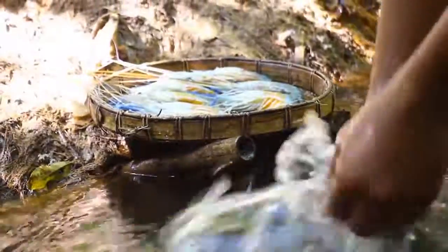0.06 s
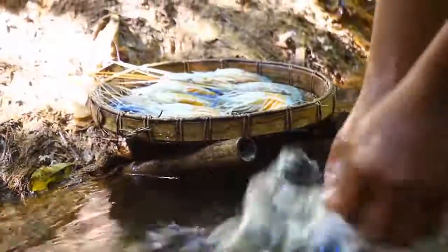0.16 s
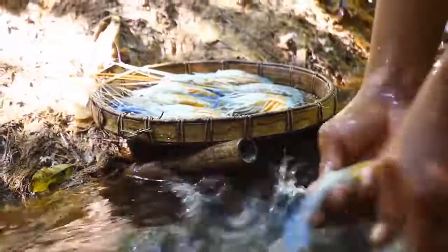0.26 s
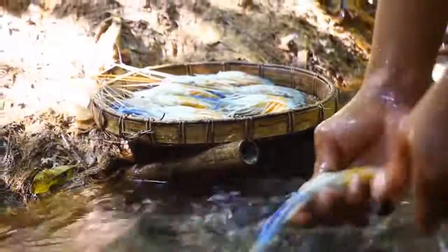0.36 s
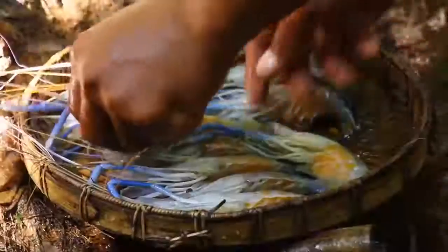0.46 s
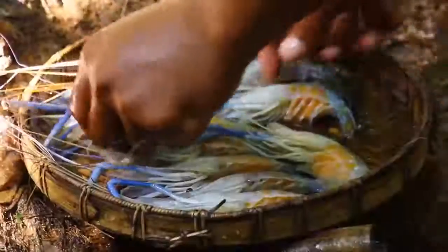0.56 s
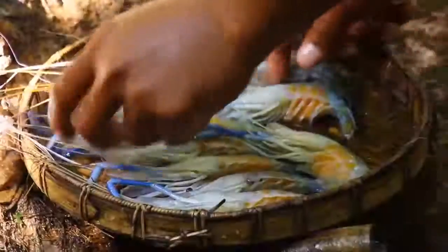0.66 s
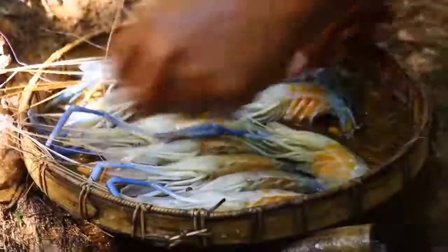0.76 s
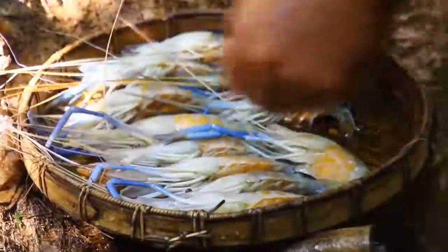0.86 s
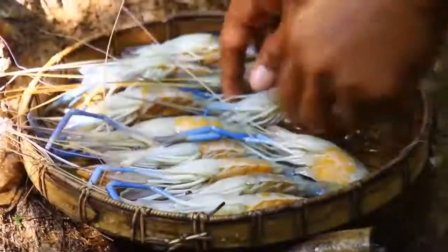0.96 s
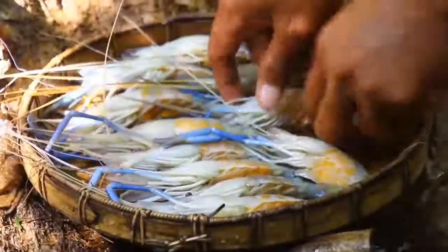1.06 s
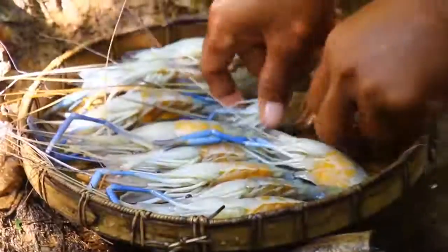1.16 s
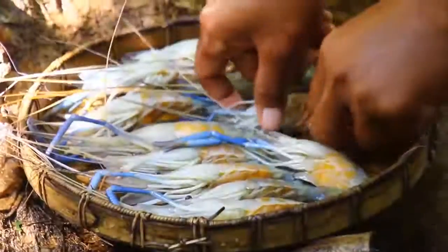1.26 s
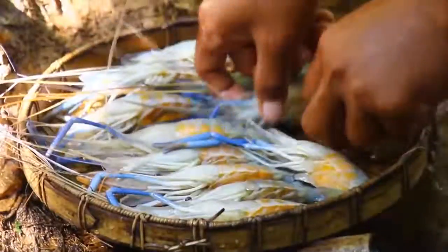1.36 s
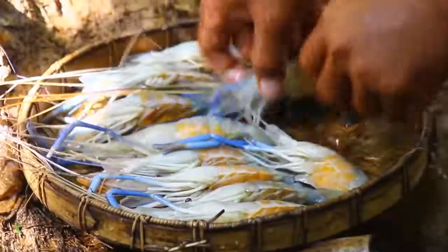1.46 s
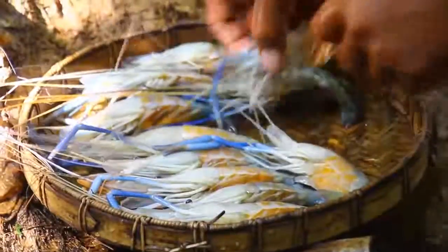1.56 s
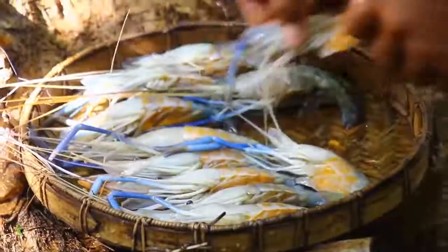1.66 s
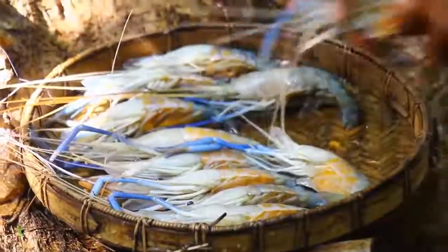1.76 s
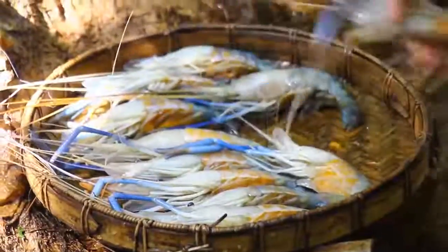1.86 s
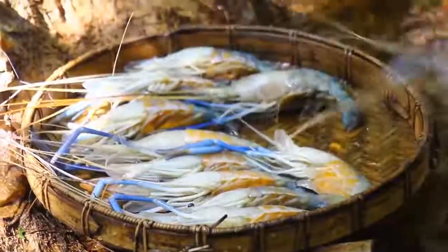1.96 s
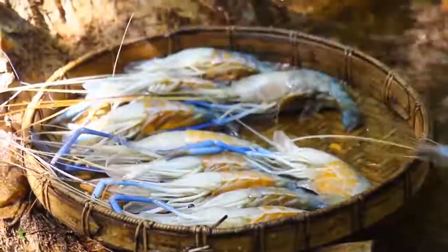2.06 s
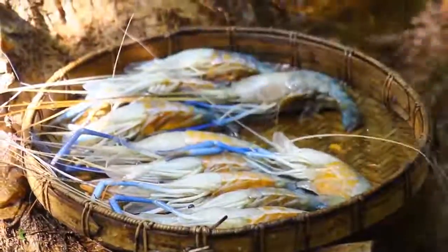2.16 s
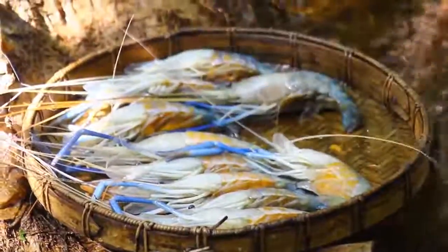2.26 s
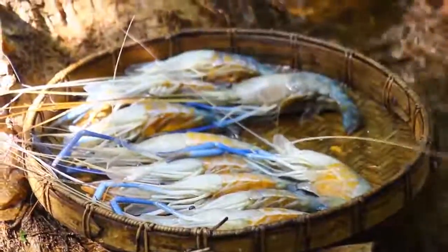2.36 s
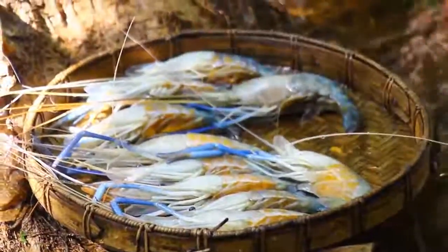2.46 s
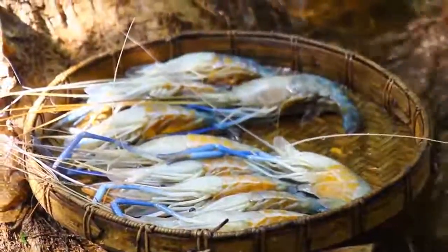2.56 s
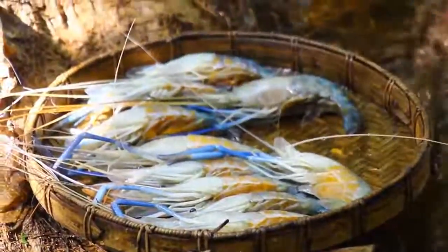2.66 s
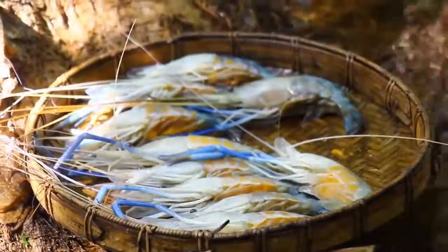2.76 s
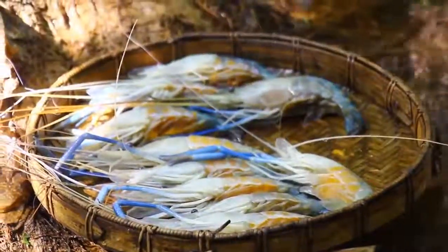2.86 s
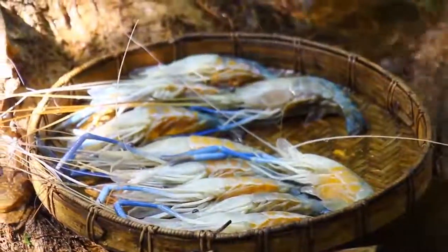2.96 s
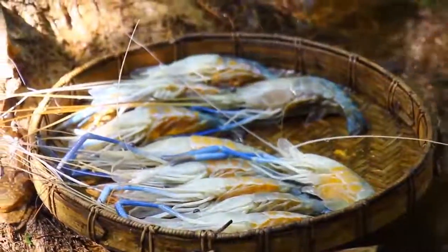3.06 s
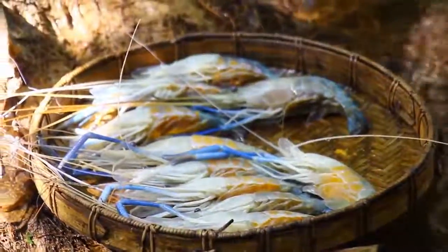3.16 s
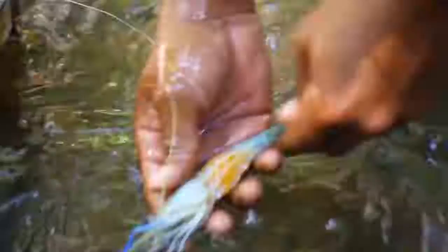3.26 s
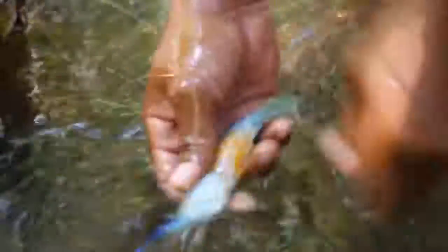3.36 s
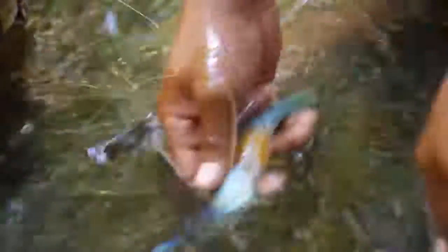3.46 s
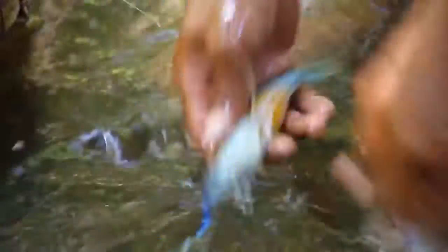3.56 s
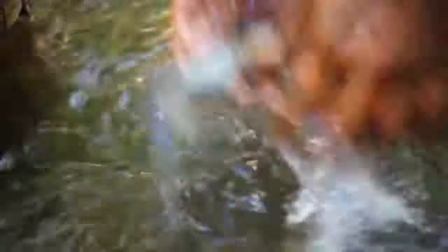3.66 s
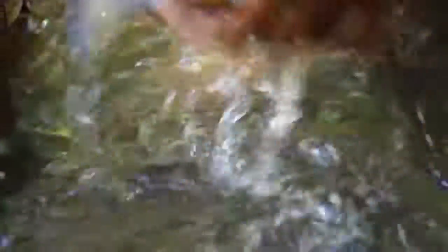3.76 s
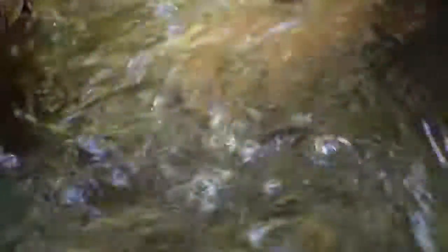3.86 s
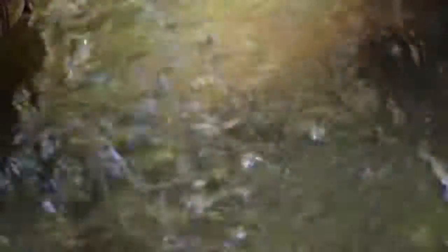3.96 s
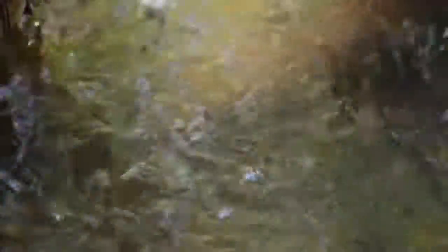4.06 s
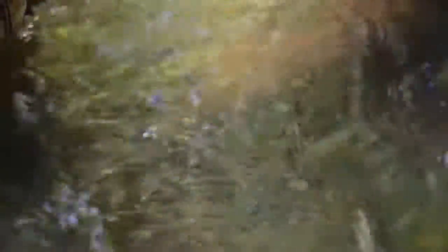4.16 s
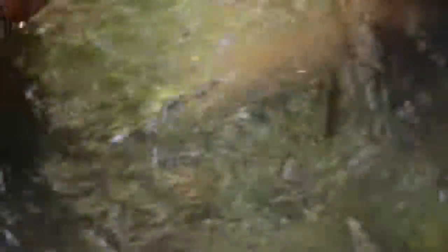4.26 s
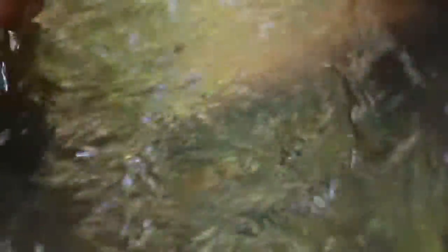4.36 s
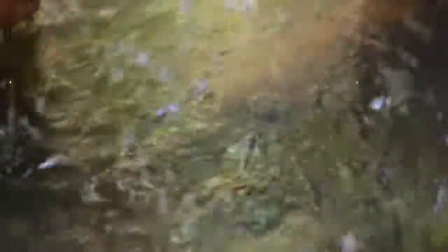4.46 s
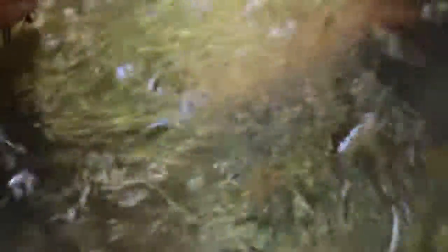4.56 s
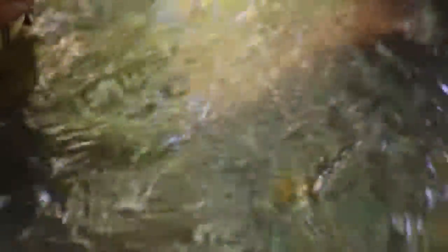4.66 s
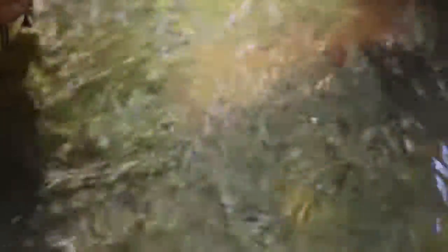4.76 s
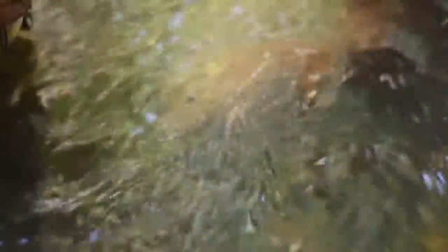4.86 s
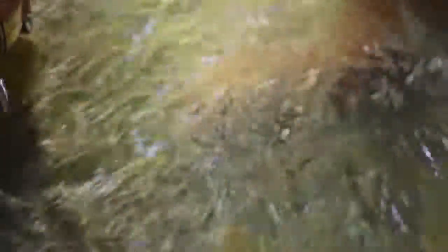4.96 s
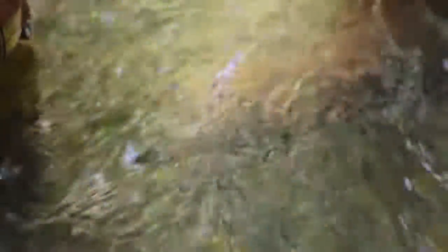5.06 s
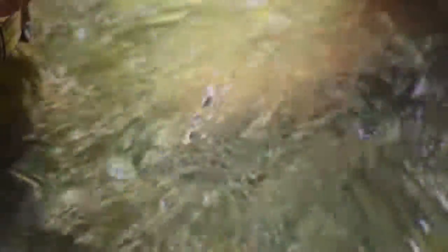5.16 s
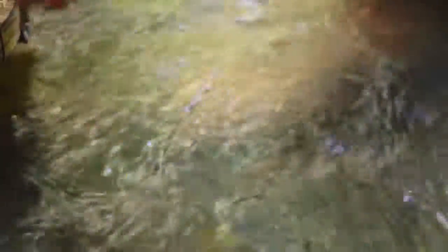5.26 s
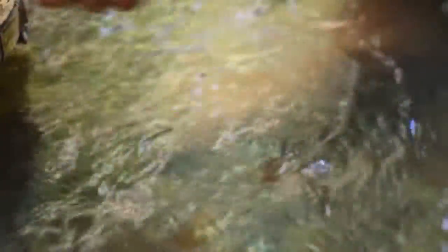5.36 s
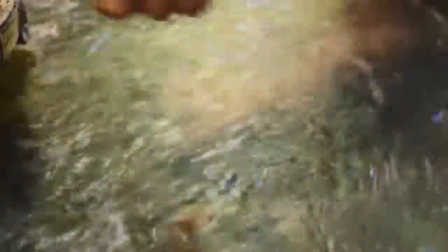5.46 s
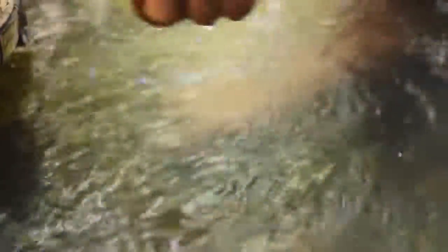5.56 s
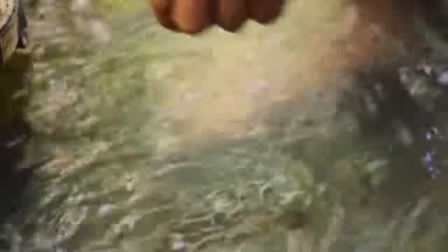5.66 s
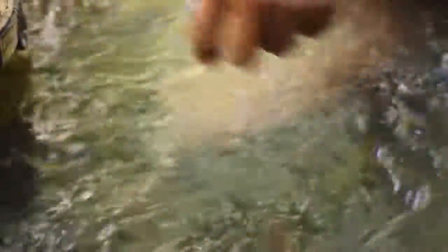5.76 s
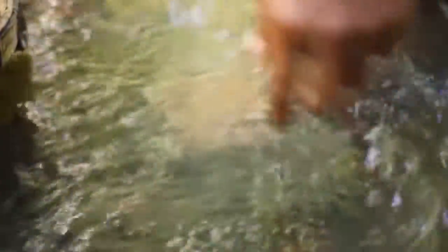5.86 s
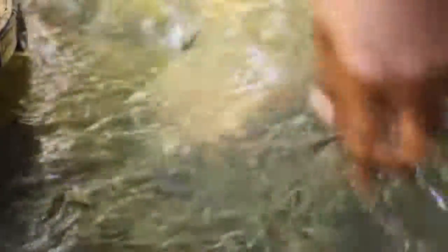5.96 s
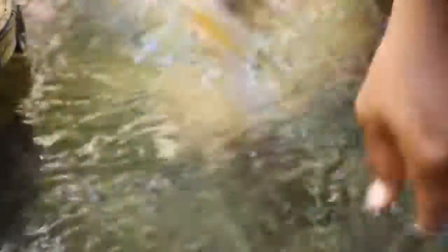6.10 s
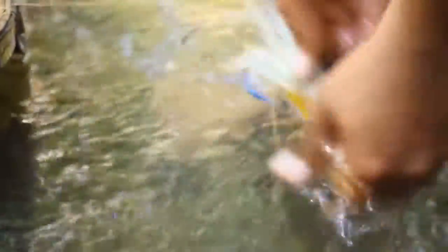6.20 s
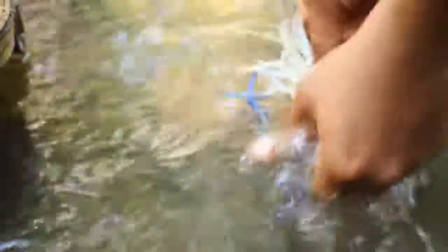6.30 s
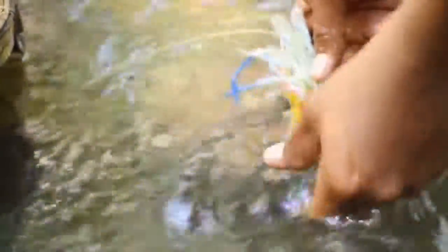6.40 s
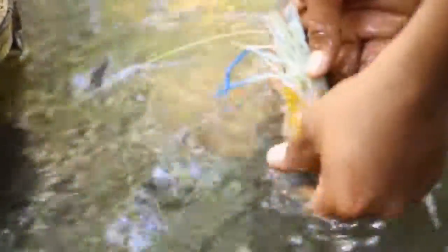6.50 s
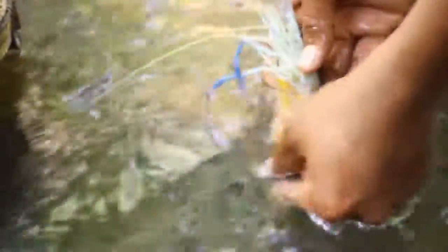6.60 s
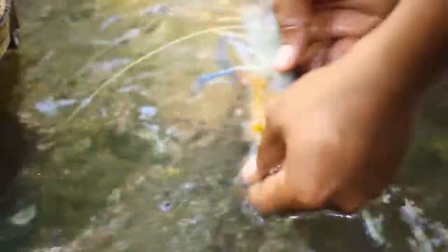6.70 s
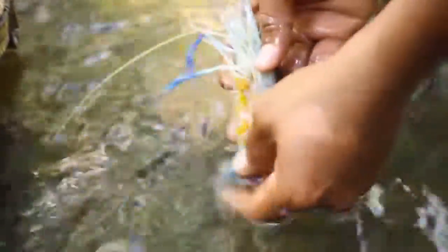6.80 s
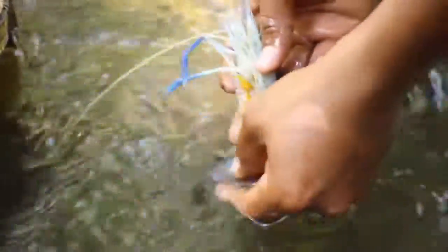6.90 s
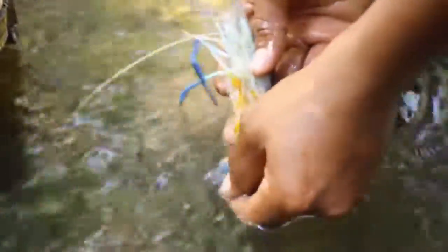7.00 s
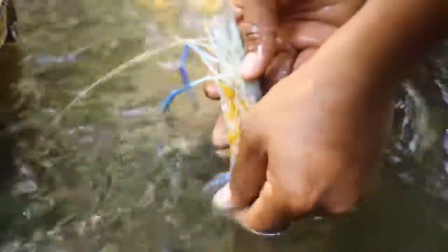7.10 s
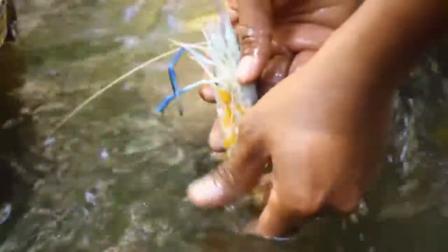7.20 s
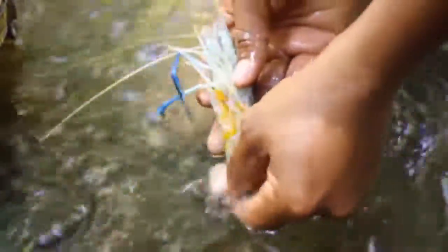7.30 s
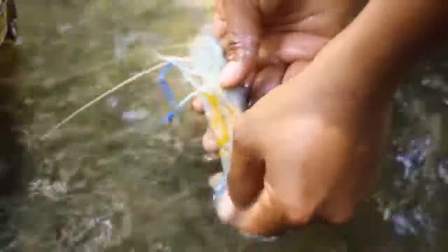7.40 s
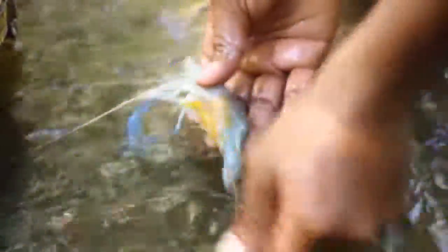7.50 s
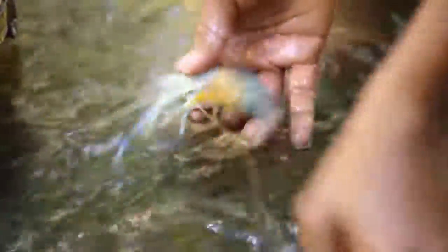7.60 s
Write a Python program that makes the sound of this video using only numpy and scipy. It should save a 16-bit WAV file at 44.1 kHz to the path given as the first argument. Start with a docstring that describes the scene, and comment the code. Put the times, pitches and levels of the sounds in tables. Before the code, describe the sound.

From 0 to about 0.45 s, hands swish hard through shallow water very near the microphone: several overlapping surges of gurgling bubbles, wet slaps with ringing hollow knocks, and bright spray. It falls sharply to a light bubbling trickle, with a few plops near 0.6 s and fuller, low bloops around 1.0 to 1.4 s. From 1.5 to 3.4 s there is sparse dabbling, small drips and a rounded bloop near 2.5 s. A second, softer swish builds at 3.5 s, peaks around 3.7 to 3.95 s with splatter and tiny upward chirping squirts, then gurgles until 4.5 s. Gentle plops and ticks continue, with a clear bloop at 5.75 s and a little bubbling cluster at 6.0 to 6.4 s, thinning to 7.6 s. A soft stream, low rumble and wavering hum lie beneath; a distant bird whistles thinly near 0.9, 5.1 and 6.9 s, with faint rasps around 3 and 4.1 s.

```python
"""A shallow stream, close by: hands rinse prawns, with a hard swish at the start, another in the middle, dabbling between.
Trapped air rings as gliding sine bubbles, near ones placed singly and small ones in random swarms over filtered noise.
Spray patters back as short ticks and mist, and water slaps on the hands as noise bursts with a knock of squeezed air.
Behind, shaped noise makes the stream and a low rumble, a hum wavers, and a far bird whistles thinly and rasps."""
import sys
import numpy as np
from scipy import signal
from scipy.fft import rfft, irfft
from scipy.io import wavfile

SR = 44100
rng = np.random.default_rng(int(sys.argv[2]) if len(sys.argv) > 2 else 0)


def dump_mix(stems):
    """Bounce the given channels to the path in sys.argv[1] as a 16-bit WAV at rate SR."""
    frames = np.atleast_2d(stems).T  # one column per channel
    limited = np.clip(frames, -1, 1)  # hard clip at full scale
    pcm = np.round(limited * 32767).astype(np.int16)
    wavfile.write(sys.argv[1], SR, pcm)


N = 336924

# strokes of the hands through the water: (full force at [s], hold [s], churn level [dB], spray level [dB])
HAND_STROKES = [(-0.01, 0.095, -20, -31), (0.12, 0.083, -22, -32.5), (0.216, 0.049, -23.5, -34),
                (0.263, 0.068, -21.5, -29), (0.362, 0.065, -38.5, -40), (0.61, 0.027, -37, -48.5),
                (0.73, 0.021, -41, -68), (0.923, 0.56, -44, -55.5), (1.383, 0.036, -36, -69),
                (1.595, 0.03, -36.5, -70), (1.855, 0.019, -46, -60), (2.238, 0.1, -40, -52),
                (3.288, 0.033, -41.5, -73), (3.539, 0.12, -33.5, -48.5), (3.664, 0.053, -27.5, -41.5),
                (3.794, 0.02, -36.5, -46), (3.858, 0.039, -32, -44.5), (3.932, 0.027, -36.5, -43.5),
                (4.189, 0.32, -41, -55), (4.77, 0.14, -41, -66), (5.179, 0.065, -38.5, -57),
                (5.602, 0.17, -47.5, -52.5), (5.998, 0.15, -46, -69), (6.286, 0.085, -39.5, -54),
                (7.613, .04, -43.5, -50)]
# large air pockets that pinch off and ring:
# (time [s], pitch [Hz], level [dB], pitch rise [shares of the starting pitch per s])
LARGE_BUBBLES = [(0.037, 894, -22, -3.5), (0.0445, 772, -15, 2.5), (0.063, 2250, -24, 5),
                 (0.094, 1790, -19, -2), (0.144, 760, -26, -4), (0.178, 740, -28, -0.5),
                 (0.197, 587, -28, 4), (0.223, 1623, -23, 5), (0.27, 730, -27, -4), (0.312, 1190, -21, 7),
                 (0.432, 1560, -27.5, 4), (0.0457, 1726, -14, 35.5), (0.063, 1246, -19, 0),
                 (0.0786, 2930, -17, -6), (0.083, 723, -17.5, -3), (0.096, 617, -30, -1),
                 (0.126, 2910, -15, -3), (0.2842, 1567, -15, 21), (0.3411, 437, -25.5, 2.5),
                 (0.3993, 821, -24, 8), (0.588, 1550, -32, 4.5), (0.6052, 997, -20.5, -4.5),
                 (0.884, 550, -36.5, -3), (1.153, 528, -34, -4.5), (1.226, 540, -38, -3.5),
                 (2.288, 518, -35, 0), (2.592, 563, -34, -2.5), (3.792, 535, -38, 0),
                 (4.424, 520, -36.5, 3.5), (7.548, 522, -37.5, 4.5), (4.886, 1063, -31.5, 2),
                 (5.31, 718, -31.5, -1.5), (5.874, 1066, -34, 4.5), (5.937, 1044, -34, 7.5),
                 (6.316, 1030, -31, 6), (3.29, 1006, -32, 14), (3.852, 1290, -28, 9.5),
                 (0.96, 1420, -30, 3), (0.974, 1700, -26.5, 1.5), (1.058, 1370, -34, 6.5),
                 (1.108, 850, -29.5, -3.5), (0.624, 2380, -29, 11), (0.9753, 480, -15.5, 5),
                 (1.1066, 528, -21, 2), (1.1745, 2370, -31, 12), (1.3484, 450, -32.5, 2.5),
                 (1.4184, 838, -24.5, 2), (1.6099, 735, -25.5, 12), (1.627, 1510, -28, -3),
                 (1.726, 592, -41, -1.5), (1.857, 610, -41, 8), (2.249, 506, -31, 3.5),
                 (2.268, 970, -31, 1.5), (2.3168, 610, -32, 4), (2.4651, 550, -23.5, 9.5),
                 (2.623, 702, -33, -6), (2.73, 1277, -32, 9.5), (2.768, 795, -33.5, 4.5),
                 (2.882, 1170, -34, 7), (3.145, 662, -31, 0), (3.1808, 1985, -25, -3.5),
                 (3.3075, 1283, -26.5, 10.5), (3.4153, 740, -31, -3.5), (3.4918, 1900, -29, 10),
                 (3.5708, 510, -22.5, 2), (3.6294, 697, -22, 12), (3.6638, 1500, -22, 2),
                 (3.686, 1094, -20, 4), (3.716, 1230, -23.5, 8.5), (3.689, 700, -25, -3.5),
                 (3.7207, 657, -25, 5), (3.741, 1260, -29, 5), (3.848, 645, -33.5, 9),
                 (3.915, 2100, -27, -5), (3.7895, 1950, -25.5, -3.5), (3.9326, 714, -29, 8),
                 (3.9788, 1210, -24, -3.5), (4.084, 712, -24.5, -6.5), (4.222, 1930, -35, 0),
                 (4.2754, 594, -29, 4.5), (4.563, 1200, -31, 6), (4.3074, 1096, -24.5, 5.5),
                 (4.3274, 2060, -26, -8), (4.3873, 591, -29, -0.5), (4.4895, 1280, -22, -7),
                 (3.862, 900, -28, 18.5), (3.894, 526, -33.5, 2.5), (4.339, 1340, -27, -0.5),
                 (4.376, 1100, -26.5, -4), (4.411, 1380, -33, -2), (5.195, 1130, -34, 3),
                 (5.204, 1970, -40, 3), (6.361, 954, -33, -7), (6.387, 1610, -26, 7), (6.388, 680, -30, 4),
                 (4.7296, 1280, -29, 8), (4.8114, 595, -31.5, -0.5), (5.187, 1900, -28, 6),
                 (5.2194, 963, -27.5, -0.5), (5.7415, 526, -19, 2.5), (5.8986, 1810, -25.5, 0),
                 (5.838, 568, -32.5, 2.5), (6.014, 655, -29, -2), (6.038, 960, -29.5, 9.5),
                 (6.0984, 2130, -30, -1), (6.1282, 1170, -28.5, 12), (6.1767, 758, -27, 6.5),
                 (6.245, 1580, -28, 17), (6.2976, 1760, -22, 12), (6.4023, 494, -31, -0.5),
                 (6.765, 454, -35.5, 2), (6.6178, 658, -28.5, 8), (6.9163, 583, -24.5, 2.5),
                 (7.0702, 622, -30, -4.5), (7.174, 1375, -29, -3), (7.322, 1840, -30.5, -6),
                 (7.5943, 683, -31.5, 5.5)]
# water slaps on a hand and squeezes a pocket of air:
# (time [s], smack level before filter and trim [dB], pocket pitch [Hz], pocket level [dB], pocket decay [cycles])
HAND_SLAPS = [(0.0034, -16.5, 2270, -5, 20), (0.0135, -13, 1570, -4, 13), (0.0566, -16, 1543, -3, 40),
              (0.0727, -22, 1600, -5.5, 39), (0.126, -13.5, 1510, 0, 19.6), (0.263, -18, 1700, -15, 78),
              (0.3078, -11, 830, -2.5, 7), (0.362, -35, 1580, -16.5, 33), (0.1956, -16.5, 900, -24, 11),
              (0.4917, -28, 670, -18, 13), (0.642, -39, 730, -15, 9.6), (0.745, -23, 1020, -22, 11),
              (0.7718, -30, 648, -22.5, 29), (0.839, -27, 1990, -16.5, 22), (1.208, -29, 530, -4.5, 3.8),
              (1.2082, -43, 1150, -11.5, 11.7), (1.409, -24, 870, -16.5, 25), (2.211, -36, 2210, -21, 39),
              (2.466, -26, 677, -21.5, 16), (2.5932, -47, 1850, -9.5, 7.9), (2.866, -26.5, 820, -28, 22),
              (3.146, -43, 1380, -29.5, 97), (3.5377, -20, 1650, -24, 32), (3.569, -23, 1230, -20, 23),
              (3.6302, -23, 1240, -21, 20), (3.8261, -16, 1150, -7, 20.5), (4.0839, -21, 800, -31, 8),
              (4.1688, -26.5, 947, -21, 38), (4.3705, -20, 1290, -21.5, 21), (4.6365, -21, 690, -24, 24),
              (4.656, -35, 675, -24.5, 21), (4.868, -23.5, 1250, -20, 55), (5.3148, -20.5, 1140, -15.5, 20),
              (5.412, -22, 940, -30, 16), (5.8353, -24, 910, -27, 39), (6.0185, -26.5, 2360, -17, 25),
              (6.29, -25, 870, -23, 22), (0.7496, -24.5, 332, -28, 5.6), (2.013, -49, 2290, -27, 41),
              (2.529, -29, 1450, -20, 18), (4.2755, -35, 1690, -17.5, 12), (4.459, -30, 342, -27.5, 4.7),
              (4.551, -26, 810, -41, 8.6), (4.8125, -46, 1840, -21, 16), (4.84, -40, 1900, -21, 15),
              (5.659, -25.5, 1470, -37, 11), (6.516, -34, 2080, -22.5, 16), (6.583, -24, 1250, -31, 14),
              (6.865, -43.5, 543, -21.5, 50), (6.377, -26, 1360, 0, 34), (6.3784, -43, 683, -11.5, 14),
              (7.112, -43, 1920, -13.5, 40), (7.63, -29, 1750, -19.5, 44), (7.633, -34, 1260, -21.5, 30)]
# air squeezed out of a prawn: (time [s], length [s], start pitch [Hz], end pitch [Hz], level [dB])
PRAWN_SQUIRTS = [(3.897, 0.011, 2870, 6020, -25), (4.023, 0.0145, 1980, 5860, -25.5)]
# drops that hit the surface: (time [s], level before the tick and ring trims [dB], pitch [Hz])
SURFACE_DROPS = [(0.141, -34.5, 7000), (0.2022, -33, 5600), (0.207, -30, 5370), (0.332, -34, 5380),
                 (0.3643, -39, 4620), (0.42, -38.5, 3850), (0.431, -43, 5770), (0.5492, -41.5, 4360),
                 (0.6867, -40.5, 2950), (0.7804, -42, 5470), (1.2666, -45, 3320), (1.279, -41, 3930),
                 (1.339, -41, 3940), (1.688, -46, 10500), (1.796, -42.5, 4100), (1.9877, -43, 2380),
                 (2.154, -33, 4800), (2.28, -37.5, 5100), (2.537, -41, 3860), (2.808, -39.5, 4100),
                 (3.0074, -41, 3750), (3.471, -34.5, 5100), (3.515, -36, 6500), (3.6045, -51, 5130),
                 (3.6293, -28.5, 3650), (3.699, -31.5, 4530), (3.8941, -30.5, 2940), (3.8972, -28.5, 4600),
                 (3.9453, -41, 2930), (3.9882, -41, 4190), (4.1237, -43.5, 4200), (4.4635, -46, 5500),
                 (4.78, -41, 3460), (4.888, -37, 3060), (5.031, -45, 4200), (5.285, -42, 5100),
                 (5.3264, -41, 8160), (5.5132, -42, 3150), (5.5958, -42.5, 2490), (5.6292, -41, 2500),
                 (5.7823, -44, 3890), (5.8552, -42.5, 8600), (6.0074, -46, 5100), (6.0621, -41, 3900),
                 (6.139, -42, 4450), (6.279, -36, 6500), (6.3622, -42, 4600), (6.661, -40, 3640),
                 (6.787, -37.5, 5400), (6.829, -42, 3250), (7.228, -36, 4340), (7.2367, -40.5, 3400),
                 (7.3802, -41, 3850)]
# water shaken off the fingers: (time [s], length [s], level before trim [dB], centre pitch [Hz])
FINGER_SPRINKLES = [(0.129, 0.02, -39, 6950), (0.216, 0.02, -39, 5200), (0.277, 0.05, -36.5, 5500),
                    (0.473, 0.007, -44, 6540), (2.164, 0.028, -52, 7900), (2.268, 0.027, -55, 7500),
                    (2.309, 0.063, -50.5, 6600), (2.52, 0.012, -47, 5940), (3.508, 0.037, -41, 5900),
                    (3.884, 0.025, -40, 6000), (3.944, 0.04, -49.5, 7400), (4.369, 0.047, -49.5, 7460),
                    (4.639, 0.029, -46.5, 5700), (7.234, 0.022, -50, 4230), (7.382, 0.012, -44, 7600),
                    (7.63, 0.012, -41, 6500), (7.593, 0.015, -38.5, 4470)]
# colour of the large stirred bubbles: (frequency [Hz], relative level [dB])
GLUG_COLOUR = [(430, -16), (580, 2.5), (750, 2.5), (1000, -1.5), (1400, -7.5), (2300, -14.5)]
# colour of the shattered bubbles: (frequency [Hz], relative level [dB])
GURGLE_COLOUR = [(430, -15), (560, -2.5), (750, -1.5), (950, -2), (1300, 5), (1700, 3.5), (2200, 2),
                 (3000, -15)]
# colour of the soft wash of noise: (frequency [Hz], relative level [dB])
WASH_COLOUR = [(90, 4.5), (200, -9), (380, -13), (520, -17), (720, 6.5), (950, 4.5), (1300, -0.5),
               (1700, 2.5), (2300, 1.5), (3300, -5.5), (5000, -14)]
# colour of the tiny bubbles the spray leaves: (frequency [Hz], relative level [dB])
FIZZ_COLOUR = [(2500, 16), (3500, 15.5), (5000, 12), (6500, 5), (9000, -11)]
# colour of the ticking droplets: (frequency [Hz], relative level [dB])
PATTER_COLOUR = [(2300, -2), (3500, 4), (5200, 2.5), (7000, -4.5), (10000, -8), (15500, -14)]
# colour of the finest droplets: (frequency [Hz], relative level [dB])
MIST_COLOUR = [(1500, 1), (3000, -0.5), (5200, 3.5), (7000, -3.5), (10000, -8.5), (16000, -14)]
# colour of the stream farther off: (frequency [Hz], relative level [dB])
STREAM_COLOUR = [(110, 10.5), (170, 2.5), (270, 3), (380, 2), (600, 4), (1000, -2), (1800, -1), (3000, -12),
                 (5500, -17), (8000, -13), (16000, -30)]
# colour of the low rumble: (frequency [Hz], relative level [dB])
RUMBLE_COLOUR = [(20, -12), (33, -5.5), (52, 1), (70, -8.5), (95, -7), (140, -63), (250, -22)]
# the rumble comes and goes: (time [s], level before trim [dB])
RUMBLE_LEVEL = [(0, -70), (0.25, -52), (0.42, -37), (0.56, -56.5), (3.3, -57), (3.38, -43.5), (4.0, -55),
                (5.2, -46.5), (5.7, -53), (6.8, -48), (7.64, -47)]
# the churn, spray and background dip briefly, then stay at a higher level: (time [s], level [dB])
BRIEF_DIP = [(0.478, -2.5), (0.483, -1), (0.508, -5), (0.518, 3.5)]
# bird whistles: (time [s], length [s], final pitch [Hz], starting level [dB], waver [Hz],
# starting offset [Hz], fade over the note [dB])
BIRD_WHISTLES = [(0.84, 0.21, 5900, -51, 60, 150, 16), (5.035, 0.45, 5800, -54, 28, -27, 13),
                 (6.825, 0.22, 5840, -47.5, 28, -40, 22), (7.435, 0.15, 12700, -64.5, 50, -1100, 7)]
# hoarse bird notes: (time [s], length [s], level [dB])
BIRD_RASPS = [(2.807, 0.081, -57), (3.007, 0.087, -59), (3.16, 0.048, -54.5), (4.118, 0.14, -56)]

CALM_DB = -43   # churn level at which crowding is one
TRICKLE_CHURN_DB, TRICKLE_SPRAY_DB = -43, -53   # the stream running past the hands between strokes
STROKE_ATTACK_S, STROKE_SETTLE_DB_PER_S = 0.0097, 151
LAPPING_DB, LAPPING_HZ = 1.21, 12   # wavelets make the bubbles come in clumps
RING_T60_S, RING_SIZE_POWER = 0.089, 1.0   # decay of a 1 kHz bubble, before surfacing cuts it short
POCKET_GLIDE = 0.41   # share by which a squeezed pocket would sharpen over its full decay
SMACK_LOW_RATIO, SMACK_HIGH_RATIO = 0.48, 4.85   # edges of the smack, in multiples of the pocket's pitch
HUM_HZ = 68.7
WHISTLE_SETTLE_S = 0.0315   # time constant of the slide onto pitch
RASP_LOW_HZ, RASP_HIGH_HZ = 5900, 7600
CUTOFF_HZ = 15900


def stirring(trickle_db, strokes):
    """Level in dB: each stroke (full at, hold, dB) swells, holds and settles, on top of the steady trickle."""
    t = np.arange(N) / SR
    power = from_db(trickle_db) ** 2
    for full_at, hold, db in strokes:
        swell = np.clip(1 + (t - full_at) / STROKE_ATTACK_S, 0, 1)
        settled_s = np.clip(t - full_at - hold, 0, 1)
        stroke = swell * from_db(db - STROKE_SETTLE_DB_PER_S * settled_s)
        power = power + stroke ** 2
    return 10 * np.log10(power)


def churn(churn_db, crowding, glug_db=-9.0, glug_share=0.65, gurgle_db=-8.5, wash_db=-16.5, wash_growth=0.28):
    """Gentle stirring frees large, wobbling bubbles; hard stirring shatters them into a gurgle over a soft wash."""
    effort_db = churn_db - CALM_DB
    glugs = swarm(GLUG_COLOUR, np.sqrt(crowding), per_s=75, cycles=107, spread_db=8.5, glide=0.38,
                  count=2000, sag=0.181, swell_cycles=2.4)
    glugs = ruffle(glugs, depth_db=2.5, rate=92)
    gurgle = swarm(GURGLE_COLOUR, crowding ** .75, per_s=480, cycles=55.5, spread_db=15.5, glide=0.28,
                   count=14000, sag=0.038, swell_cycles=1.26)
    gurgle = ruffle(gurgle, depth_db=2.4, rate=140)
    wash = colour(rng.standard_normal(N) * from_db(3 * drift(45)), WASH_COLOUR)
    gentle = from_db(CALM_DB + glug_db + glug_share * effort_db) * glugs
    hard = from_db(gurgle_db) * gurgle + from_db(wash_db + wash_growth * effort_db) * wash
    return gentle + from_db(churn_db) * hard


def plops(flutter_db=1.0, flutter_hz=140):
    """The large, near bubbles: the lower the pitch, the longer the ring; the restless surface makes them flutter."""
    out = np.zeros(N)
    for s, hz, db, rise in LARGE_BUBBLES:
        t60 = RING_T60_S * (1000 / hz) ** RING_SIZE_POWER
        add(out, s, from_db(db) * bubble(hz, t60, rise))
    return out * from_db(flutter_db * np.clip(drift(flutter_hz), -2, 2))


def wakes(level_db=-16.0, spread_db=5.0, within_s=0.045, top_ratio=2.405, cycles=55, glide=0.2, count=2):
    """Each large bubble sheds smaller ones, which gurgle after it at higher pitches."""
    out = np.zeros(N)
    for (s, hz, db, _), shed in zip(LARGE_BUBBLES, rng.random((len(LARGE_BUBBLES), count, 3))):
        for delay, pitch, size in shed:
            own_hz = hz * top_ratio ** (.2 + .8 * pitch)
            t60 = cycles / own_hz
            own_db = db + level_db + spread_db * (2 * size - 1.5)
            add(out, s + within_s * delay, from_db(own_db) * bubble(own_hz, t60, glide / t60, swell_cycles=2))
    return out


def slaps(smack_db=2.5, top_ratio=2.28, bottom_ratio=0.18):
    """Wavelets slap the hands and the caught air gives a rising knock; the larger the pocket, the duller the smack."""
    out = np.zeros(N)
    for s, smack, hz, pocket, cycles in HAND_SLAPS:
        t60 = cycles / hz
        hit = impact(hz * SMACK_LOW_RATIO, hz * SMACK_HIGH_RATIO, decay_s=0.0072, splatter=0.29)
        hit = band(hit, hz * bottom_ratio, hz * top_ratio)
        add(out, s, from_db(smack + smack_db) * hit)
        add(out, s, from_db(pocket) * bubble(hz, t60, POCKET_GLIDE / t60))
    return out


def squirts(rough_db=2.5, jitter=0.12):
    """Air squeezed out of a rinsed prawn: a ragged chirp that shoots upwards as the pocket closes."""
    out = np.zeros(N)
    flutter = from_db(rough_db * drift(500))
    waver = 1 + jitter * drift(420)
    for s, length, start_hz, end_hz, db in PRAWN_SQUIRTS:
        along = np.linspace(0, 1, int(length * SR))
        now = slice(int(s * SR), int(s * SR) + len(along))
        hz = start_hz * (end_hz / start_hz) ** (along ** 1.35) * waver[now]
        shape = 4 * along * (1 - along) * flutter[now]
        add(out, s, from_db(db) * shape * np.sin(2 * np.pi * np.cumsum(hz) / SR))
    return out


def spray(spray_db, crowding, fizz_db=-7.5, patter_db=-7.0, mist_db=-10.0):
    """Droplets patter in short ticks of their own pitch and leave tiny bubbles; the finest merge into a hiss."""
    fizz = swarm(FIZZ_COLOUR, crowding, per_s=1000, cycles=52, spread_db=33, glide=0.076, count=16000)
    fizz = ruffle(fizz, depth_db=4.5, rate=240)
    ticks = swarm(PATTER_COLOUR, np.sqrt(crowding), per_s=1100, cycles=42, spread_db=23, glide=0.068, count=14000)
    ticks = ruffle(ticks, depth_db=5.5, rate=56)   # the patter comes in clumps
    mist = colour(rng.standard_normal(N) * from_db(1.9 * drift(60)), MIST_COLOUR)
    mix = from_db(fizz_db) * fizz + from_db(patter_db) * ticks + from_db(mist_db) * mist
    return from_db(spray_db) * mix


def drops(tick_db=5.0, ring_db=15.5, cycles=30, decay_s=0.0046, splatter=0.2):
    """Each drop ticks and traps a tiny bubble of its own pitch."""
    out = np.zeros(N)
    for s, db, hz in SURFACE_DROPS:
        add(out, s, from_db(db + tick_db) * impact(hz * .8, hz * 1.4, decay_s, splatter))
        add(out, s, from_db(db + ring_db) * bubble(hz, cycles / hz, rise=29))
    return out


def sprinkles(level_db=-1.0, per_s=900, fade_db=14, spread_octaves=0.42, cycles=22, size_db=4.5):
    """Water shaken off the fingers lands as a brief, soft shower of droplets, each with a tiny ring of its own."""
    out = np.zeros(N)
    chances = rng.standard_normal((len(FINGER_SPRINKLES), 200, 3))
    for (s, length, db, hz), droplets in zip(FINGER_SPRINKLES, chances):
        landed = min(int(per_s * length) + 2, len(droplets))
        shower = np.zeros(SR // 2)
        for k, (delay, pitch, size) in enumerate(np.clip(droplets[:landed], -2, 2)):
            along = abs(k + delay / 2) / landed
            own_hz = hz * 2 ** (spread_octaves * pitch)
            gain = from_db(size_db * size - fade_db * along)
            add(shower, length * along, gain * bubble(own_hz, cycles / own_hz, rise=0))
        mean_power = np.sum(shower ** 2) / (length * SR)
        add(out, s, from_db(db + level_db) * shower / np.sqrt(mean_power + 1e-20))
    return out


def banks(x, wet_db=-14.0, t60=0.05):
    """Faint scattered echoes from the banks and the crouching body."""
    t = np.arange(SR // 2) / SR
    echoes = rng.standard_normal(len(t)) * from_db(-60 * t / t60) * (t > .003)
    return x + from_db(wet_db) * signal.fftconvolve(x, echoes / np.linalg.norm(echoes))[:N]


def background(stream_db=-55, rumble_db=-2.0, hum_db=-54.5, waver_hz=1.73):
    """The smooth rush of the stream farther off, a low rumble and a hum that wavers in pitch and level."""
    rumble_level, = in_time(RUMBLE_LEVEL)
    stream = from_db(stream_db) * colour(rng.standard_normal(N), STREAM_COLOUR)
    rumble = from_db(rumble_level + rumble_db) * colour(rng.standard_normal(N), RUMBLE_COLOUR)
    swell = 1 + .55 * drift(5)
    pitch = HUM_HZ + waver_hz * drift(5.2)
    hum = swell * np.sqrt(2) * np.sin(2 * np.pi * np.cumsum(pitch) / SR)
    return stream + rumble + from_db(hum_db) * hum


def bird(flutter_db=2.0):
    """Thin whistles slide onto pitch and fade, a few notes hiss hoarsely; all flutter on their way through the trees."""
    out, waver = np.zeros(N), drift(150)
    for s, length, hz, db, waver_hz, slide_hz, fade_db in BIRD_WHISTLES:
        along = np.linspace(0, 1, int(length * SR))
        edges = np.minimum(20 * np.minimum(along, 1 - along), 1)
        shape = edges * from_db(db - fade_db * along)
        slide = slide_hz * np.exp(-along * length / WHISTLE_SETTLE_S)
        pitch = hz + slide + waver_hz * waver[:len(along)]
        add(out, s, shape * np.sin(2 * np.pi * np.cumsum(pitch) / SR))
    hiss = rms_one(band(rng.standard_normal(N), RASP_LOW_HZ, RASP_HIGH_HZ))
    for s, length, db in BIRD_RASPS:
        shape = signal.windows.tukey(int(length * SR))
        add(out, s, from_db(db) * shape * hiss[int(s * SR):][:len(shape)])
    return out * from_db(flutter_db * drift(25))


def bubble(hz, t60, rise, sag=0.0, swell_cycles=0.73):
    """An air pocket pinches off and rings, sagging as it is pulled under, gliding by rise, dying as it surfaces."""
    t = np.arange(int(t60 * SR) + 2) / SR
    swell = 1 - np.exp(-hz * t / swell_cycles)
    surfaced = 1 / (1 + (2.4 * t / t60) ** 8)
    decay = np.exp(-np.log(1000) * t / t60)
    sinking_s = t60 / 10
    # the phase in turns: steady pitch, linear glide, and a sharp start that sags
    turns = hz * (t + rise * t * t / 2 + sag * sinking_s * (1 - np.exp(-t / sinking_s)))
    return swell * surfaced * decay * np.sin(2 * np.pi * turns)


def swarm(spectrum, crowding, per_s, cycles, spread_db, glide, count, sag=0.0, swell_cycles=0.86):
    """Random bubbles at even overall power: the more crowded, the more of them and the weaker each."""
    out, low, high = np.zeros(N), spectrum[0][0], spectrum[-1][0]
    when, chance, size, pitch, damping, depth = rng.random((count, 6)).T
    rate = np.minimum(per_s * crowding[(when * N).astype(int)], count * SR / N)
    hz = low * (high / low) ** pitch
    t60 = cycles * 2 ** (3 * damping - 1.5) / hz
    gain = from_db(at_hz(spectrum, hz) + spread_db * size ** 2) * np.sqrt(hz / t60 / rate)
    rise = glide * (1.31 * depth - .3) / t60
    for k in np.flatnonzero(chance < rate * N / SR / count):
        ring = bubble(hz[k], t60[k], rise[k], sag * (1 - depth[k]), swell_cycles)
        add(out, when[k] * N / SR, gain[k] * ring)
    return rms_one(out)


def impact(low_hz, high_hz, decay_s, splatter):
    """Water hits water or skin: one sharp pulse, then a brief splatter; peak one."""
    t = np.arange(SR // 20) / SR
    push = splatter * rng.standard_normal(len(t)) * np.exp(-t / decay_s) + (t == 0)
    hit = band(band(push, low_hz, high_hz, order=1), low_hz / 2, high_hz * 2)
    return hit / np.abs(hit).max()


def ruffle(x, depth_db, rate):
    """The restless surface makes a sound flutter, which blurs its pitch; unit power."""
    return rms_one(x * from_db(depth_db * np.clip(drift(rate), -2, 2)))


def drift(rate):
    """Random wander with a spread of one: noise through two equal low-pass poles at rate Hz."""
    step = 40   # samples between control points
    pole = np.exp(-2 * np.pi * rate * step / SR)
    noise = rng.standard_normal(N // step + 2002)
    slow = signal.lfilter([1], [1, -2 * pole, pole * pole], noise)[2000:]   # skip the filter's start
    return np.interp(np.arange(N) / step, np.arange(len(slow)), rms_one(slow))


def colour(x, spectrum):
    """Give a signal a smooth spectrum that falls away beyond both ends; unit power."""
    hz = np.maximum(np.arange(N + 1) * SR / (2 * N), 1)
    low_end = 1 + (spectrum[0][0] / hz / np.sqrt(2)) ** 4
    high_end = 1 + (hz / spectrum[-1][0] / np.sqrt(2)) ** 4
    gain = from_db(at_hz(spectrum, hz)) / (low_end * high_end)
    return rms_one(irfft(rfft(x, 2 * N) * gain)[:N])


def band(x, low_hz, high_hz, order=2):
    """Causal band-pass."""
    sos = signal.butter(order, [low_hz, min(high_hz, .45 * SR)], "band", fs=SR, output="sos")
    return signal.sosfilt(sos, x + 1e-18)


def at_hz(points, hz):
    """Read a spectrum on a log-frequency axis."""
    point_hz, db = np.transpose(points)
    return np.interp(np.log(hz), np.log(point_hz), db)


def in_time(rows):
    """Each column of a curve at every sample."""
    s, *columns = np.transpose(rows)
    return [np.interp(np.arange(N) / SR, s, c) for c in columns]


def add(out, s, sound):
    """Mix a sound in, starting at s seconds."""
    start = int(np.clip(round(s * SR), 0, N - 1))
    out[start:start + len(sound)] += sound[:N - start]


def rms_one(x):
    """Scale to unit power."""
    return x / np.sqrt(np.mean(x ** 2) + 1e-20)


def from_db(db):
    """Decibels to gain."""
    return 10 ** (np.asarray(db) / 20)


def scene():
    """Harder stirring traps more bubbles and throws more drops; the level dips briefly after the first swish."""
    churn_db = stirring(TRICKLE_CHURN_DB, [(s, hold, db) for s, hold, db, _ in HAND_STROKES])
    churn_db = churn_db + LAPPING_DB * drift(LAPPING_HZ)
    spray_db = stirring(TRICKLE_SPRAY_DB, [(s, hold, db) for s, hold, _, db in HAND_STROKES])
    crowding = from_db(.75 * (churn_db - CALM_DB))
    dip_db, = in_time(BRIEF_DIP)
    dip = from_db(dip_db)
    stirred = churn(churn_db, crowding) + spray(spray_db, crowding)
    single = plops() + wakes() + slaps() + squirts() + drops() + sprinkles()
    return (banks(single + dip * stirred) + dip * background() + bird())[None]


def record(dry, port_hz=2895, port_width_hz=70, port_gain=0.19):
    """The microphone housing rings at one narrow pitch; the top is cut."""
    ringing = signal.lfilter(*signal.iirpeak(port_hz, port_hz / port_width_hz, fs=SR), dry)
    top_cut = signal.ellip(10, .1, 80, CUTOFF_HZ, fs=SR, output="sos")
    return signal.sosfilt(top_cut, dry + port_gain * ringing)


dry = scene()
out = record(dry)
dump_mix(out)
```